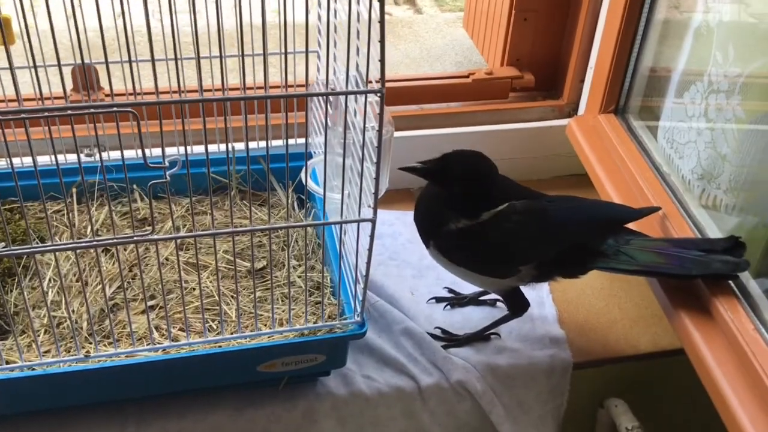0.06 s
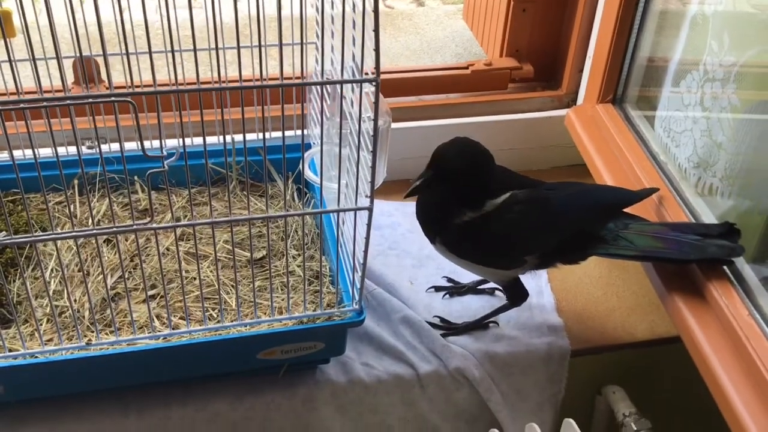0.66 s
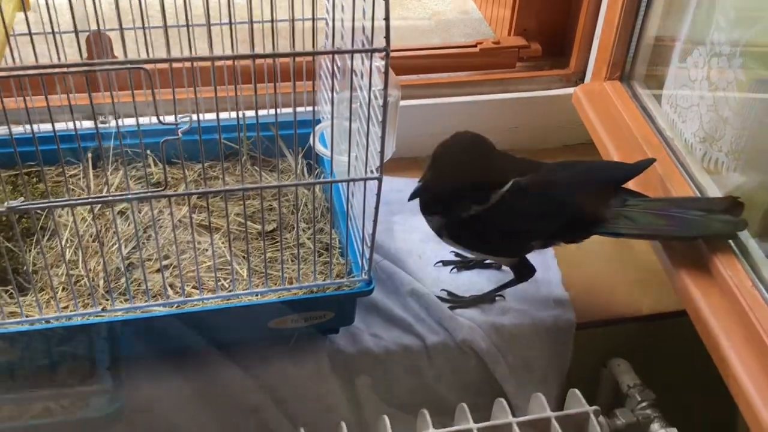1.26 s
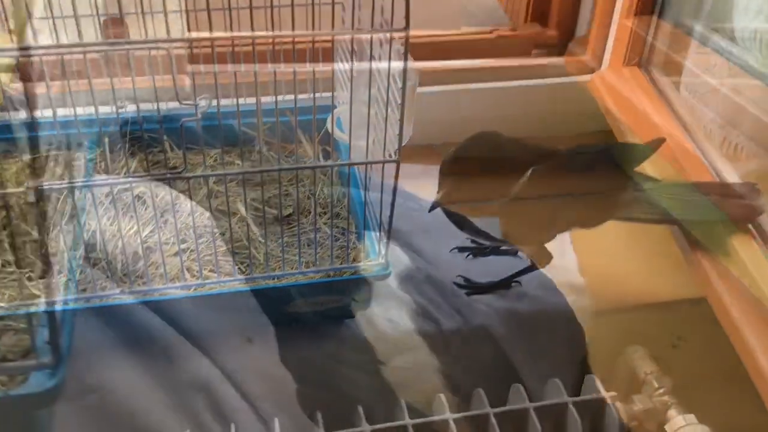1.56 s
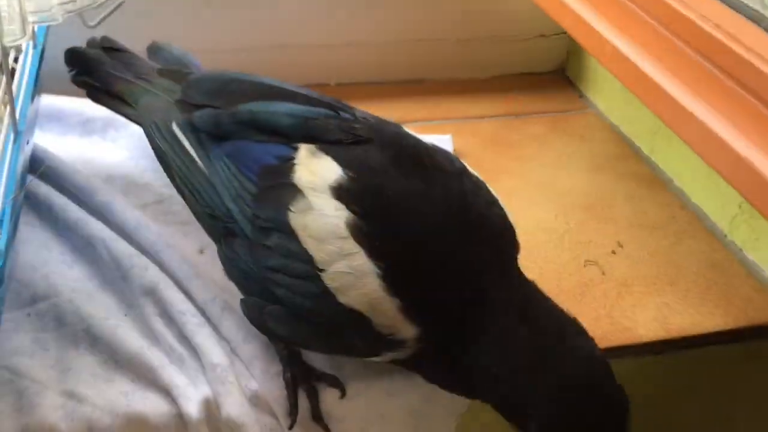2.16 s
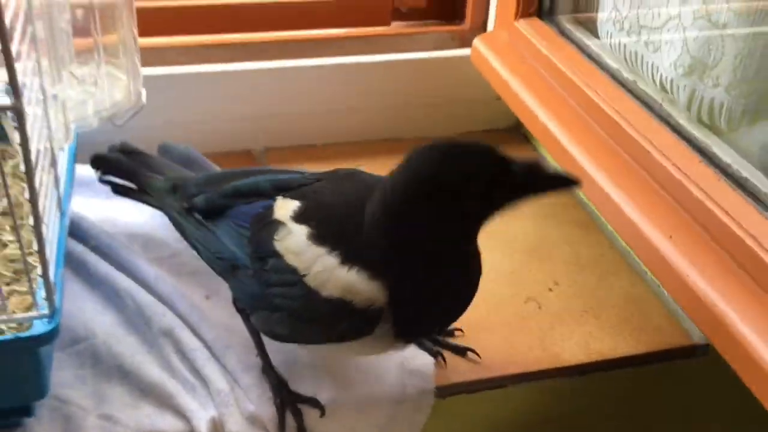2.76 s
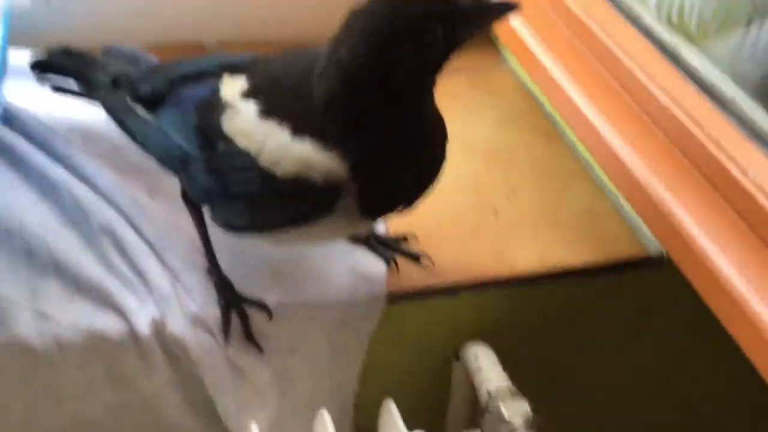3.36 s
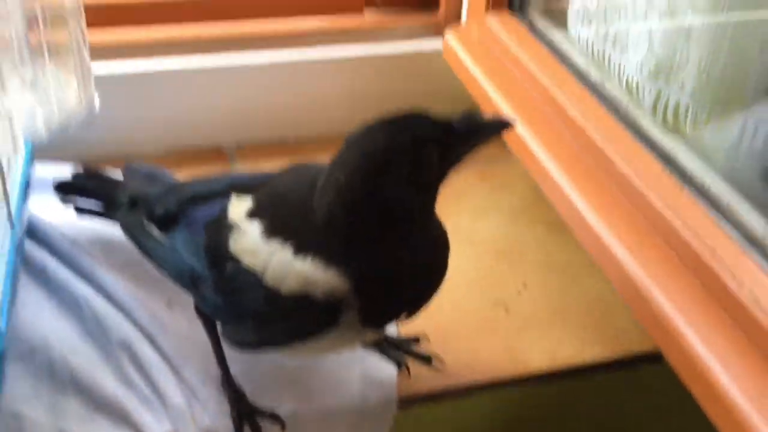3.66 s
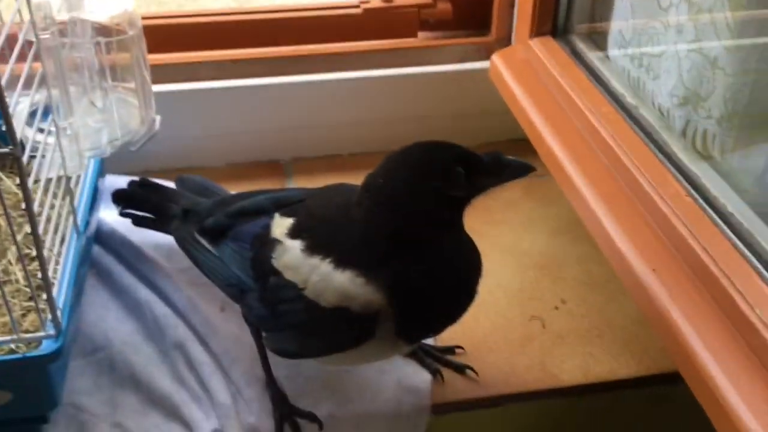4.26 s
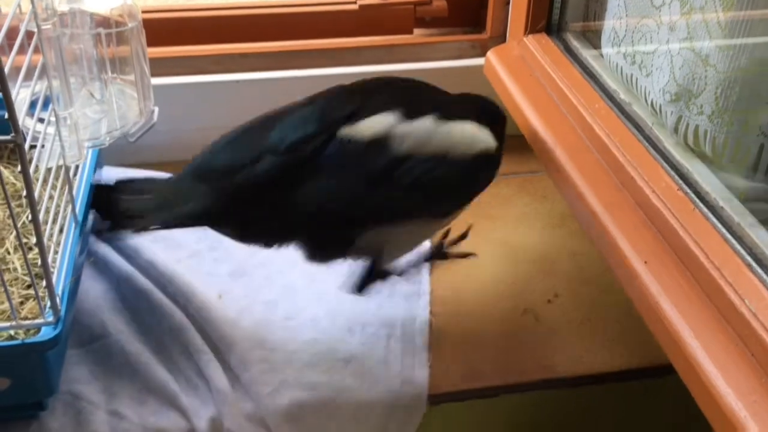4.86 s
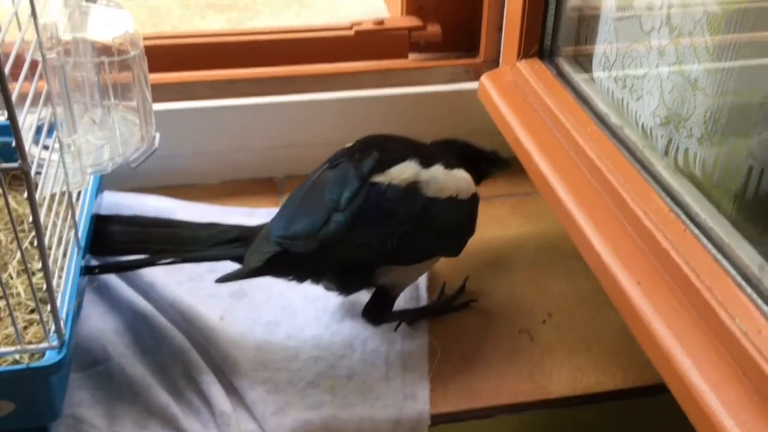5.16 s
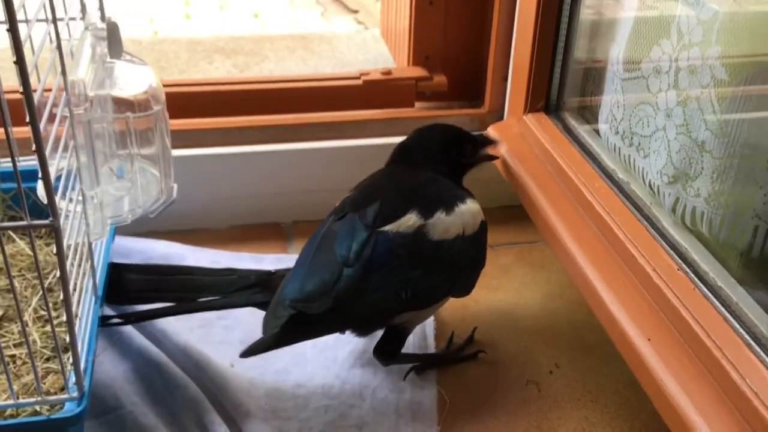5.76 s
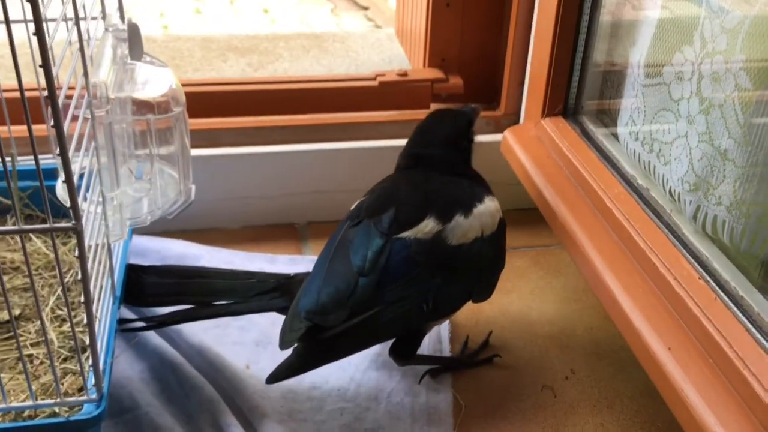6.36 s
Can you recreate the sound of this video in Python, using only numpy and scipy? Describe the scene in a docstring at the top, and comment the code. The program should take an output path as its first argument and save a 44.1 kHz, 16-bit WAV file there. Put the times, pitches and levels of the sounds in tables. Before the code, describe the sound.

A young magpie, close by at the open window of a small room, gives seven short squeals that flick upward and break into a rasp, coming faster toward the end. Its claws tick twice. Outside, a dove coos and sparrows chirp over distant traffic. About halfway, everything cuts off; thin hiss fades in, and one loud harsh squawk is followed by a few faint gliding notes and a soft whine.

```python
"""A young magpie on the sill of an open window in a small room: seven short squeals that flick up and break
into a rasp, pulses and breath from its syrinx shaped by throat and beak. Two faint ticks sound; outside, a dove
coos and sparrows chirp in wavering pure tones over the rumble of far traffic. The last squeal is cut short by a
second, bass-less scene: hiss fades in under one loud harsh squawk, faint hollow swells, a few soft gliding
notes and a whine."""
import sys
import numpy as np
from scipy import signal
from scipy.fft import rfft, irfft, next_fast_len
from scipy.io import wavfile
from scipy.ndimage import uniform_filter1d, minimum_filter1d, map_coordinates

SR = 44100
rng = np.random.default_rng(int(sys.argv[2]) if len(sys.argv) > 2 else 0)


def transcribe(signal):
    """Save signal, clipped to [-1, 1], as a 16-bit WAV file at the path in sys.argv[1]."""
    frames = np.atleast_2d(signal).T
    limited = np.clip(frames, -1, 1)
    pcm = np.round(limited * 32767).astype(np.int16)
    wavfile.write(sys.argv[1], SR, pcm)


N = 287091
TIME = np.arange(N) / SR
SCENE_CHANGE_S, TOP_HZ = 3.522, 15150

# Magpie cues: (start [s], flick [s], rasp [s], end [s], first pitch [Hz], flick pitch [Hz],
# tone level [dB], rasp level [dB], roughness [0-1], treble [dB])
SQUEALS = [(0.547, 0.643, .665, .690, 1355, 1535, -27.5, -28, 0.3, 0.5),
           (1.455, 1.535, 1.556, 1.584, 1369, 1518, -28, -30.5, 0.31, -2),
           (2.564, 2.612, 2.631, 2.646, 1217, 1398, -27.5, -28, 0.15, -10),
           (2.874, 2.965, 2.999, 3.018, 1300, 1479, -28, -27, 0.15, -4.5),
           (3.111, 3.145, 3.190, 3.222, 1351, 1560, -27, -27.5, 0.24, -2.5),
           (3.311, 3.348, 3.375, 3.405, 1365, 1481, -28, -29, 0.5, 1.5),
           (3.488, 3.531, 3.550, 3.570, 1396, 1533, -27.5, -52.5, 0.38, 2)]
# Low creak into the third squeal: (time [s], pitch [Hz], level [dB], roughness [0-1])
CREAK = [(2.515, 714.9, -51, 0.2), (2.53, 752, -37.5, .2), (2.55, 767.1, -34, 0.4),
         (2.568, 763.9, -53.5, 0.2)]
# Formants of the throat and nearly shut beak: (frequency [Hz], gain [dB])
SHUT_BEAK = [(900, -49), (1400, -37.5), (1850, -18), (2300, -8.5), (2850, 2), (3300, -8.5), (3750, -15.5),
             (4300, -15.5), (4900, -28), (5500, -11.5), (6500, -13.5), (7400, -9), (8150, -24), (8800, -19),
             (12000, -40)]


def squeals():
    """Each squeal climbs slowly on the throat resonance, flicks up past it and breaks into a rattle."""
    out = np.zeros(N)
    for start, flick, rasp, end, first_hz, flick_hz, db, rasp_db, rough, treble_db in SQUEALS:
        glide = flick - start
        t, pitch, level = controls([(start - .004, first_hz * .96, db - 9.5),
                                    (start + .1341 * glide, first_hz * 1.035, db + 1),
                                    (start + .6 * glide, (first_hz + flick_hz) / 2, db),
                                    (flick, flick_hz * 1.01, db + 4),
                                    (flick + .3433 * (rasp - flick), 1810, db + 1),
                                    (rasp + .0028, 1920, db)])
        strain = np.interp(t, [start, flick - .369 * glide, flick], [.7, 1.5, .6])  # hoarsest mid-climb
        pitch = pitch * (1 + .0095338 * wobble(t, 90.972))
        voice = syrinx(t, pitch, rough * strain, SHUT_BEAK, jitter=.08232,
                       flutter=.21, flutter_hz=258.95, air=.202, air_hz=5950, pull=1.0833)
        shelf_db = np.interp(t, [start, rasp], [treble_db - 2, treble_db / 2 + .5])
        add(out, t, amp(level) * treble_shelf(voice, shelf_db))
        t, pitch, level = controls([(rasp - .003, 1500, rasp_db - 14),
                                    (rasp + .006, 1420, rasp_db + 4.5),
                                    (end + .0014, 1350, rasp_db + .5)])
        rattle = syrinx(t, pitch, .96235, SHUT_BEAK, jitter=.11218,
                        flutter=.4095, flutter_hz=145.95, air=.29)
        add(out, t, amp(level) * treble_shelf(rattle, treble_db / 2 - 3.5))
    t, pitch, level, rough = controls(CREAK)
    creak = syrinx(t, pitch, rough, SHUT_BEAK, jitter=.04, flutter=.87, flutter_hz=148.86, air=1)
    add(out, t, amp(level) * creak)
    return out


def syrinx(t, pitch, rough, throat, jitter, flutter, flutter_hz, air, air_hz=5000, pull=0):
    """Pulses and gated air through the throat; roughness shakes their timing and size."""
    # the two sides of the syrinx beat against each other, in size (flutter) and timing (pull)
    beat = np.sin(phase_of(flutter_hz * (1 + .19851 * wobble(t, 69.495))))
    phase = phase_of(pitch * (1 + jitter * rough * wobble(t, 901.46))) + pull * rough * beat
    k = np.arange(1, 26)[:, None]
    pulses = unit((np.cos(k * phase - k * k / 2) * (k * pitch < TOP_HZ)).sum(0))
    turbulence = unit(rng.standard_normal(len(t)) * (1 + np.cos(phase)))
    # the higher the partial, the more of it dissolves into hiss
    air_share = lambda hz: np.clip(air * (hz ** 2 + 7279000) / (hz ** 2 + air_hz ** 2), 0, 1)
    formants = lambda hz: amp(along(throat, hz)) / (1 + (hz / 12000) ** 12)
    voiced = filtered(pulses, lambda hz: formants(hz) * np.sqrt(1 - air_share(hz)))
    breath = filtered(turbulence, lambda hz: formants(hz) * np.sqrt(air_share(hz)))
    voice = voiced + np.sqrt(2 * abs(rough)) * breath
    return unit(voice * np.exp(flutter * rough * beat))


def squeal_ring(x, ring_hz=2940, width_hz=190):
    """A narrow band rings on long after each squeal."""
    band = filtered(x, lambda hz: 1 / (1 + ((hz - ring_hz) / width_hz) ** 2))
    return amp(-15) * (room(band, wet_db=-3, stretch=2.26, early_db=-31.5) - band)


# Faint ticks: (time [s], level [dB])
TICKS = [(.764, -39.5), (1.117, -41)]


def ticks(decay_s=.026):
    """Tiny ticks of bright noise."""
    out = np.zeros(N)
    for start, db in TICKS:
        t, level = controls([(start, db), (start + decay_s, db - 43)])
        add(out, t, amp(level) * rng.standard_normal(len(t)), edge=.0005)
    return filtered(out, lambda hz: hz ** 2 / (hz ** 2 + 4000 ** 2) / (1 + (hz / 11000) ** 4))


# Bright squawk formants, beak wide open: (frequency [Hz], gain [dB])
GAPING_BEAK = [(1000, -46), (1700, 1.5), (2050, -15), (2350, -4), (3000, -0.5), (3750, -18.5), (4600, -7),
               (5400, -25), (6400, -5.5), (7200, -20.5), (8200, -9), (9600, -37), (11500, -27.5)]
# Dark squawk formants, beak closing: (frequency [Hz], gain [dB])
CLOSING_BEAK = [(650, -43), (950, -15.5), (1200, -16), (1700, 1.5), (2000, -7), (2450, 4), (3000, -13),
                (3700, -25), (4700, -20.5), (5400, -27.5), (6400, -30.5), (7200, -55.5), (8200, -23.5),
                (10500, -50.5)]


def squawk(db=-19, clear_hz=812, harsh_hz=602.15, quaver_hz=37.35):
    """Both sides of the syrinx at once: a bright quaver sinks into a dark rasp as the beak closes."""
    out = np.zeros(N)
    t, level = envelope(5.026, 5.24, attack=.04533, release=.03674, edge_db=-14)
    broken = ease(t, start=5.089, length=.037)  # the voice drops and turns harsh
    quaver = np.pi * quaver_hz * (t - 5.039)
    clear_pitch = clear_hz * (1 + .076728 * np.cos(2 * quaver))
    harsh_pitch = harsh_hz * (1 + .045 * wobble(t, 60))
    pitch = blend(clear_pitch, harsh_pitch, broken)
    rough = blend(.06, .40332, broken)
    bright = syrinx(t, pitch, rough, GAPING_BEAK, jitter=.07,
                    flutter=.5, flutter_hz=96.51, air=1, air_hz=4957)
    dark = syrinx(t, pitch, rough, CLOSING_BEAK, jitter=.0955,
                  flutter=.28, flutter_hz=95.347, air=1, air_hz=2873, pull=.711)
    gape = np.interp(t, [5.095, 5.125, 5.17, 5.22], [1, .512, .3306, .066])
    voice = gape * bright + np.sqrt(1 - gape ** 2) * dark
    # the other side whistles in pointed swings, then locks on to the fourth harmonic at the break
    swing_hz = 850 * np.exp((t[0] - t) / .11) * (1 - 2 * abs(np.sin(quaver)))
    whistle = tone(t, blend(2980 + swing_hz, 4 * harsh_pitch, broken), waver=.029952, waver_hz=351.73)
    whistle *= amp(blend(-2.5, -2, broken))
    add(out, t, amp(db + level) * (voice + whistle), edge=.013107)
    return out


def whine(db=-42.5, below_db=-16, above_db=-7):
    """A soft note that swoops up and sags: three neighbouring partials of a low buzz."""
    out = np.zeros(N)
    t, level = envelope(6.278, 6.44, attack=.01559, release=.04095, edge_db=-9)
    pitch = swoop(t, crest=6.35, first_hz=1996.2, crest_hz=3128.6, last_hz=2541.2)
    phase = phase_of(pitch * (1 + .017173 * wobble(t, 381.18)))
    buzz = phase / 6
    sidebands = amp(below_db) * np.sin(phase - buzz) + amp(above_db) * np.sin(phase + buzz)
    add(out, t, amp(db + level) * unit(np.sin(phase) + sidebands))
    return out


# Dove cues: (start [s], crest [s], end [s], first pitch [Hz], crest pitch [Hz], level [dB], fade [dB])
COOS = [(0.8, 0.926, 1.0, 517.8, 600, -35, -14), (1.072, 1.19, 1.4148, 492.5, 643.2, -37.5, -4),
        (1.691, 1.749, 1.89, 476.1, 654, -38.5, -4.5), (2.125, 2.255, 2.39, 425.9, 704.6, -37.5, -15),
        (2.456, 2.526, 2.855, 463.6, 665, -42, -5), (3.069, 3.125, 3.265, 462.4, 660, -40, -8.5)]
# Low resonance of the window bay: (frequency [Hz], gain [dB])
WINDOW_BAY = [(380, -18.5), (450, 6.5), (530, 1), (590, -5), (630, -9.5), (665, -19.5), (720, -17)]


def dove():
    """Two phrases of three hollow, nearly pure coos; each leaps up and sinks ever faster."""
    out = np.zeros(N)
    for start, crest, end, first_hz, crest_hz, db, fade_db in COOS:
        t, level = envelope(start, end, attack=.01882, release=.01584, edge_db=-8.5)
        level = level + db + fade_db * (t - start) / (end - start) + 2.5 * wobble(t, 35)
        pitch = swoop(t, crest, first_hz, crest_hz, last_hz=454.85, power=2.5)
        add(out, t, amp(level) * tone(t, pitch, waver=.021448, waver_hz=108.1), edge=.0027)
    return filtered(out, lambda hz: amp(along(WINDOW_BAY, hz)))


# High sparrow notes that arch and plunge: (peak time [s], peak pitch [Hz], level [dB])
SPARROW_ARCHES = [(.318, 5655, -52.5), (0.791, 5700, -49.5), (.953, 5473, -46.5), (1.279, 5887, -55),
                  (2.642, 5202, -41.5), (2.911, 5613, -37.5), (3.012, 5210, -39.5), (3.226, 5613, -45.5),
                  (3.468, 5399, -45)]
# Lower sparrow chips with a sharp peak: (peak time [s], peak pitch [Hz], level [dB])
SPARROW_CHIPS = [(.42, 4873, -39), (.487, 4678, -43.5), (1.048, 4480, -39), (2.33, 3940, -62.5),
                 (2.746, 4338, -37.5), (3.113, 4193, -38), (3.314, 4564, -37)]


def sparrows(flutter_db=5, chip_rise_s=.031, chip_fall_s=.023987):
    """Two quick, slightly buzzy whistles, often in turn: a high arch and a lower peaked chip."""
    out = np.zeros(N)
    for peak, peak_hz, db in SPARROW_ARCHES:
        t, offset, level = controls([(peak - .015, -1, db - 5.5), (peak, 0, db), (peak + .032, 1, db)])
        pitch = peak_hz * (1 - .33 * offset ** 2)
        level += flutter_db * wobble(t, 173.28)
        add(out, t, amp(level) * tone(t, pitch, waver=.04, waver_hz=784.06))
    for peak, peak_hz, db in SPARROW_CHIPS:
        t, pitch = controls([(peak - chip_rise_s, peak_hz - 33000 * chip_rise_s),
                             (peak, peak_hz),
                             (peak + chip_fall_s, peak_hz - 58000 * chip_fall_s)])
        level = db + np.interp(t, [peak - chip_rise_s / 2, peak, t[-1]], [1.5, -1, -14.5])
        level += flutter_db * wobble(t, 160)
        add(out, t, amp(level) * tone(t, pitch, waver=.03536, waver_hz=817.9))
    return out


# Faint slurs: (start [s], length [s], first pitch [Hz], last pitch [Hz], level [dB])
SLURS = [(2.03, 0.094, 4377, 4215, -60.5), (2.448, 0.1184, 4500, 4510, -53.5),
         (2.516, 0.035915, 4910, 5578, -39), (2.775, .065, 4250, 4200, -51),
         (5.614, 0.0322, 3260, 2520, -55.5), (5.698, 0.03807, 2248, 3593, -51),
         (6.166, 0.059, 2850, 1501, -52.5), (6.447, 0.044, 2880, 3031, -47.5),
         (6.451, 0.02884, 8970, 8429, -52.5)]


def soft_slurs():
    """Faint straight glides: thin bird whistles in scene one, the magpie's soft notes in scene two."""
    out = np.zeros(N)
    for start, length, first_hz, last_hz, db in SLURS:
        t, pitch = controls([(start, first_hz), (start + length, last_hz)])
        add(out, t, amp(db) * tone(t, pitch, waver=.03, waver_hz=804.87), edge=.006)
    return out


def far_sparrows(count=85, db=-62):
    """A wash of faint falling chirps, scattered over the first scene."""
    out = np.zeros(N)
    for when, high, slur, loud in rng.random((count, 4)):
        start, hz = when * (SCENE_CHANGE_S - .1), 3900 + 1800 * high
        t, pitch, level = controls([(start, hz, db + 6 * loud + .5),
                                    (start + .04, hz * (.85 + .11 * slur), db - 3)])
        add(out, t, amp(level) * tone(t, pitch, waver=.032, waver_hz=786.66), edge=.021)
    return out


# Far-off hollow swells: (time [s], level [dB])
SWELLS = [(3.99, -67), (4.21, -57.5), (4.6, -54), (5.47, -57.5)]
# Their two resonances: (frequency [Hz], gain [dB])
SWELL_BANDS = [(780, -4.5), (1290, -2)]


def swells(length_s=.1099, width=.054):
    """A hollow noise in two narrow bands that comes and goes."""
    out = np.zeros(N)
    for start, db in SWELLS:
        t, level = envelope(start, start + length_s, attack=.03465, release=.035, edge_db=-11)
        for centre_hz, band_db in SWELL_BANDS:
            noise = rng.standard_normal(len(t))
            band = filtered(noise, lambda hz: 1 / (1 + ((hz / centre_hz - 1) / width) ** 2))
            add(out, t, amp(db + band_db + level) * unit(band), edge=.0067)
    return out


# Low bed of far traffic: (frequency [Hz], level [dB])
TRAFFIC = [(15, -48), (25, 1), (70, 0.5), (97, -8), (178, -11), (214, -13), (305, -10.5), (484, -11),
           (669, -21), (746, -21.5), (1000, -22.5), (1300, -59), (2200, -120)]
# Outdoor air in the first scene: (frequency [Hz], level [dB])
OUTDOOR_AIR = [(470, -28.5), (800, -19), (962, 0.5), (1070, 2), (1270, -0.5), (2570, -8), (2900, -3),
               (3280, -6.5), (5350, -11), (6360, -15), (15000, -27.5)]
# Thin hiss in the second scene: (frequency [Hz], level [dB])
HISS = [(650, -12), (800, 1), (1000, -2), (1300, -2), (1800, -4.5), (2600, -7), (3300, -10), (5000, -13),
        (8000, -16), (15000, -18.5)]


def ambience(spectrum, sway_db):
    """A bed of air or far traffic: shaped noise whose level sways a little."""
    noise = unit(filtered(rng.standard_normal(N), lambda hz: amp(along(spectrum, hz))))
    return noise * amp(sway_db * wobble(TIME, 6.8476))


# Small-room reverb before stretching: (frequency [Hz], 60 dB decay time [s])
ROOM_DECAY = [(300, 0.2442), (1500, 0.612), (2900, 0.48915), (5000, 0.4789), (10000, 0.32316)]


def room(x, wet_db, stretch=1, early_db=-13):
    """Direct sound, echoes from pane and frame, and a tail where each frequency dies at its own speed."""
    hz, t, noise = signal.stft(rng.standard_normal(SR), SR, nperseg=256)
    decay = amp(-60 * t / (stretch * along(ROOM_DECAY, hz)[:, None]))
    tail = signal.istft(noise * decay, SR, nperseg=256)[1]
    tail = np.pad(tail, (SR // 300, 0))  # pre-delay
    response = amp(wet_db) * tail / np.linalg.norm(tail)
    delays = rng.integers(SR // 500, SR // 90, size=6)
    response[delays] += amp(early_db) * rng.choice([-1, 1], size=6) / np.sqrt(len(delays))
    return x + signal.fftconvolve(x, response)[:N]


def limiter(x, ceiling=.33267):
    """Fast gain control that holds the peaks down."""
    gain = np.minimum(1, ceiling / (abs(x) + 1e-9))
    return x * uniform_filter1d(minimum_filter1d(gain, size=90), size=90)


def treble_shelf(x, treble_db):
    """Raise or lower everything above the main throat resonance."""
    body = filtered(x, lambda hz: 1 / (1 + (hz / 3700) ** 12))
    return body + amp(treble_db) * (x - body)


def filtered(x, gain):
    """EQ x with a gain that is a function of frequency."""
    size = next_fast_len(len(x) + 8192)
    return irfft(rfft(x, size) * gain(np.fft.rfftfreq(size, 1 / SR)), size)[:len(x)]


def tone(t, pitch, waver, waver_hz):
    """A whistle of rms 1 whose pitch wavers at random."""
    return unit(np.sin(phase_of(pitch * (1 + waver * wobble(t, waver_hz)))))


def swoop(t, crest, first_hz, crest_hz, last_hz, power=2):
    """A pitch that swoops up to its crest and then sinks ever faster."""
    rise = ease(t, t[0], crest - t[0])
    sink = np.clip((t - crest) / max(t[-1] - crest, 1 / SR), 0, 1) ** power
    return first_hz + (crest_hz - first_hz) * rise - (crest_hz - last_hz) * sink


def envelope(start, end, attack, release, edge_db):
    """Sample times of a call and its level in dB: up from edge_db, hold at 0, back down."""
    t = np.arange(round(start * SR), round(end * SR)) / SR
    return t, edge_db * (1 - np.clip(np.minimum((t - start) / attack, (end - t) / release), 0, 1))


def controls(rows):
    """Sample times and automation curves from (time, values...) breakpoints."""
    times, *columns = np.transpose(rows)
    t = np.arange(round(times[0] * SR), round(times[-1] * SR)) / SR
    return [t] + [np.interp(t, times, column) for column in columns]


def add(track, t, x, edge=.003516):
    """Mix a call into the track, with fades of edge seconds."""
    x = x * np.clip(np.minimum(t - t[0], t[-1] - t) / edge, 0, 1)
    part = track[round(t[0] * SR):][:len(x)]
    part += x[:len(part)]


def wobble(t, rate):
    """A smooth random curve, rate knots a second."""
    position = (t - t[0]) * rate
    return map_coordinates(rng.standard_normal(int(position[-1]) + 4), [position])


def ease(t, start, length):
    """A smooth step from 0 to 1."""
    return (1 - np.cos(np.pi * np.clip((t - start) / length, 0, 1))) / 2


def blend(a, b, mix):
    """Crossfade from a to b."""
    return (1 - mix) * a + mix * b


def along(points, hz):
    """(Hz, value) points read on a log axis."""
    freqs, values = np.transpose(points)
    return np.interp(np.log(hz + 1), np.log(freqs), values)


def phase_of(hz):
    """Running phase of a pitch curve."""
    return 2 * np.pi * np.cumsum(hz) / SR


def amp(db):
    """Decibels to gain."""
    return 10 ** (np.asarray(db) / 20)


def unit(x):
    """Scale to rms 1."""
    return x / np.sqrt(np.mean(x ** 2) + 1e-20)


def scene(low_cut_hz=715, fade_in_s=1.4106):
    """The squeal scene stops dead; the squawk scene has no bass, and its hiss fades in."""
    coos = amp(-2) * room(dove(), wet_db=-4.5, stretch=1.471)
    chirps = sparrows() + soft_slurs() + far_sparrows()
    soft_calls = coos + amp(-4) * room(chirps, wet_db=-2.5, stretch=.773, early_db=-11)
    calls = squeals()
    magpie = amp(-4.5) * (room(calls + ticks(), wet_db=-5, stretch=.9601) + squeal_ring(calls))
    traffic_db = blend(-53, -50, ease(TIME, start=.6013, length=.1467))
    traffic = amp(traffic_db) * ambience(TRAFFIC, sway_db=.6681)
    air = amp(-57) * ambience(OUTDOOR_AIR, sway_db=2.8466)
    first = magpie + soft_calls + traffic + air

    fade_in = np.clip(.03739 + (TIME - SCENE_CHANGE_S) / fade_in_s, 0, 1)
    hiss = amp(-54) * fade_in * ambience(HISS, sway_db=1)
    voices = room(squawk(), wet_db=-13, stretch=.8503) + room(whine(), wet_db=-4.5)
    second = limiter(voices + soft_calls * (TIME > 5) + hiss + swells())
    second = filtered(second, lambda hz: 1 / np.sqrt(1 + (low_cut_hz / (hz + 10)) ** 48))
    switch = 1 - np.clip((SCENE_CHANGE_S - TIME) / .002, 0, 1)
    return blend(first, second, switch)[None]


def record(dry):
    """A brick-wall low-pass on the whole mix."""
    return np.array([filtered(x, lambda hz: hz < TOP_HZ) for x in dry])


dry = scene()
out = record(dry)
transcribe(out)
```